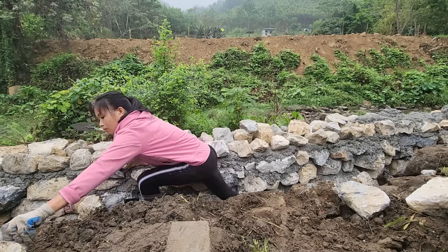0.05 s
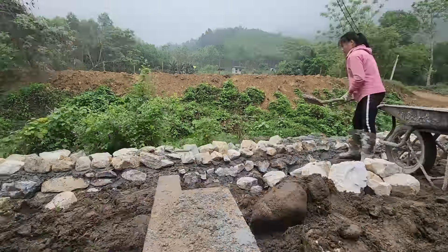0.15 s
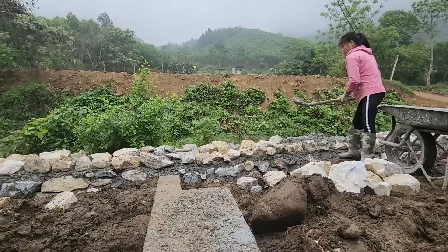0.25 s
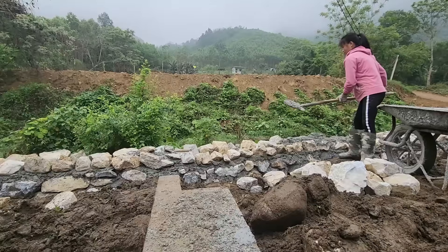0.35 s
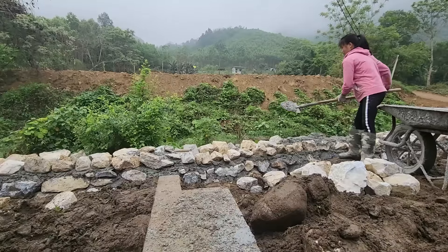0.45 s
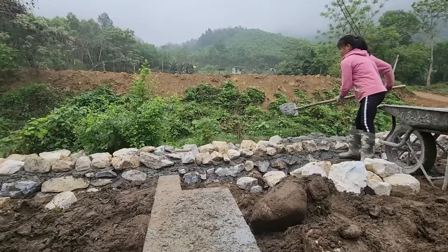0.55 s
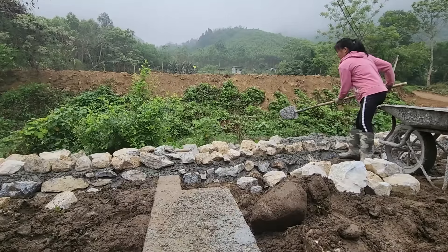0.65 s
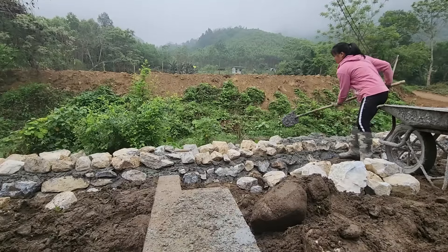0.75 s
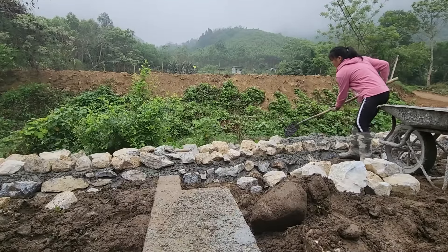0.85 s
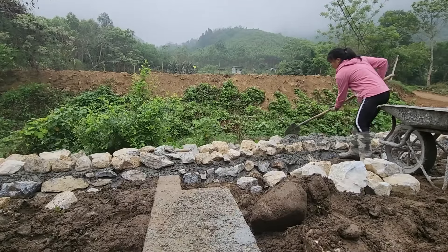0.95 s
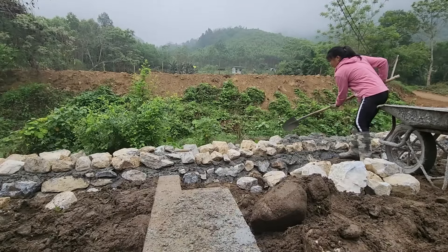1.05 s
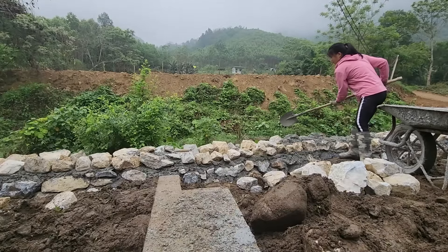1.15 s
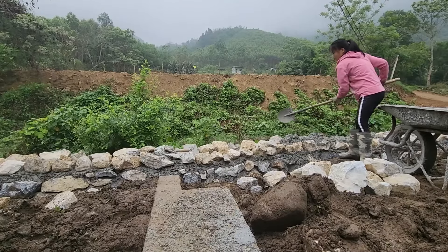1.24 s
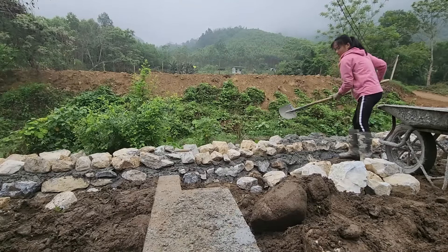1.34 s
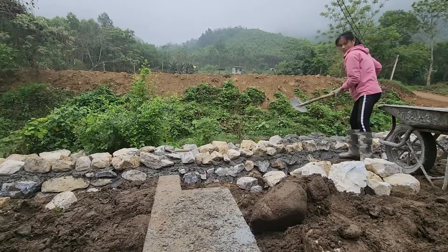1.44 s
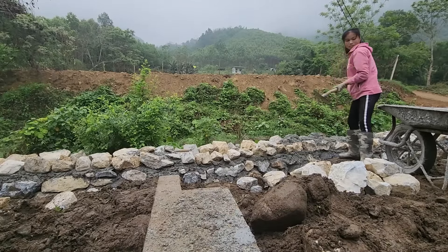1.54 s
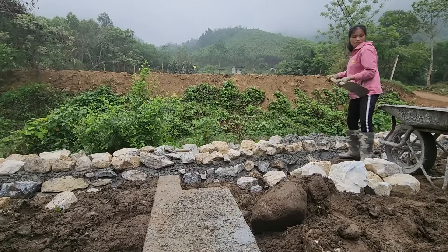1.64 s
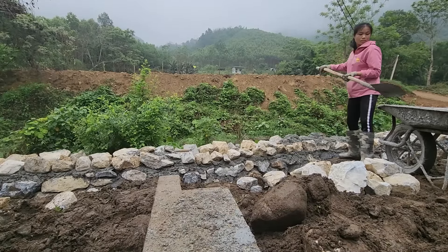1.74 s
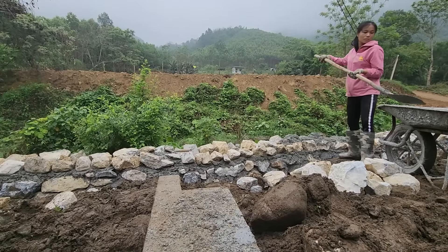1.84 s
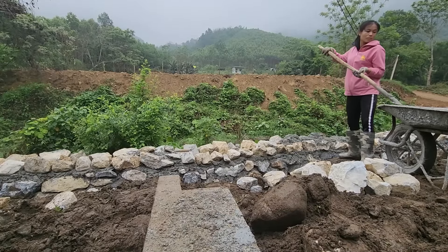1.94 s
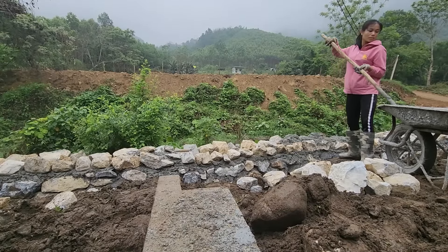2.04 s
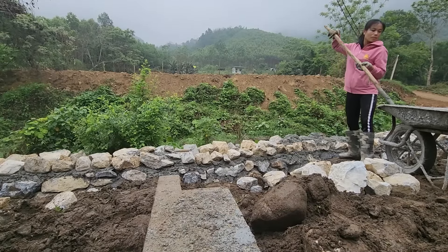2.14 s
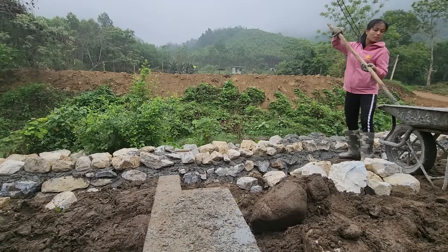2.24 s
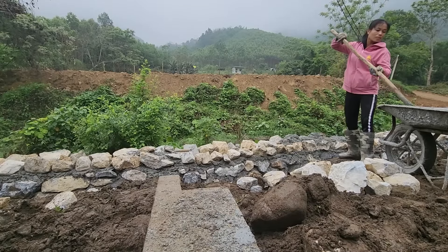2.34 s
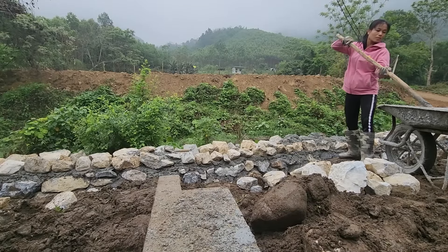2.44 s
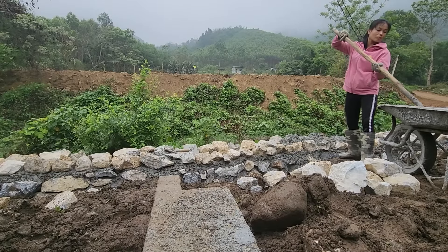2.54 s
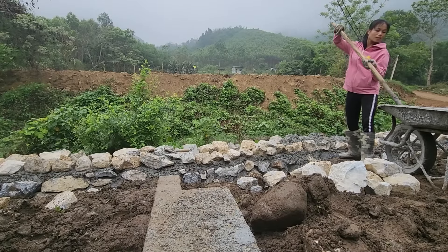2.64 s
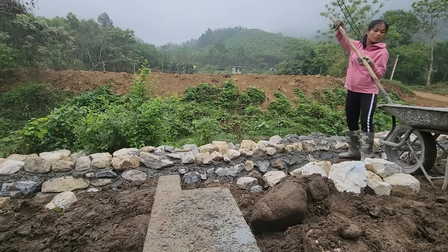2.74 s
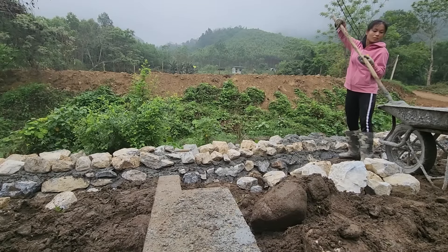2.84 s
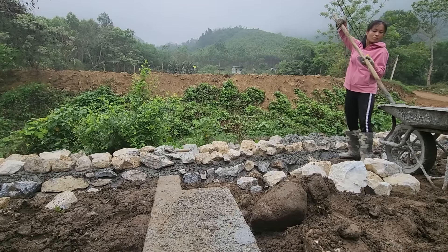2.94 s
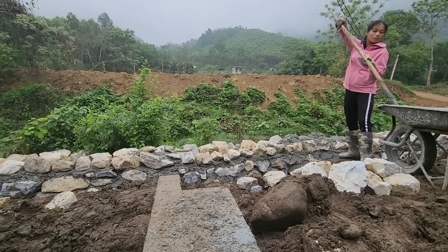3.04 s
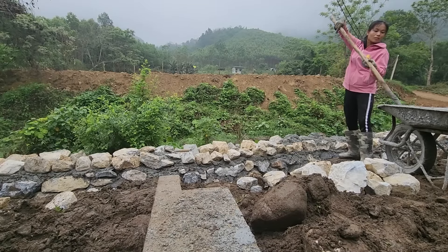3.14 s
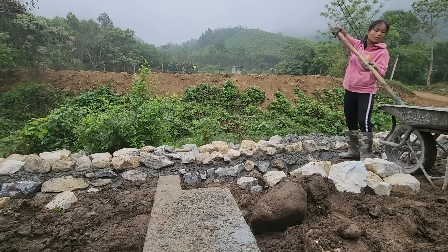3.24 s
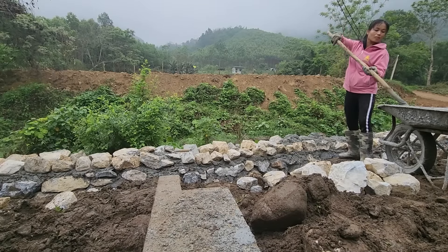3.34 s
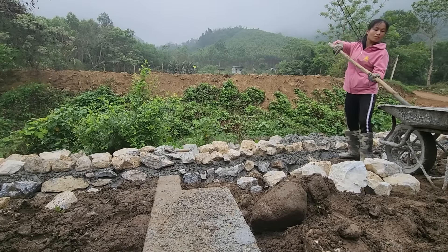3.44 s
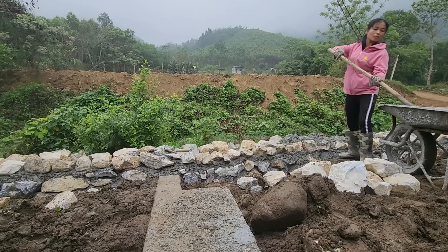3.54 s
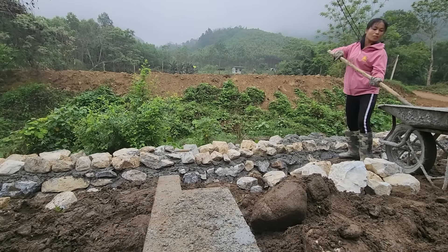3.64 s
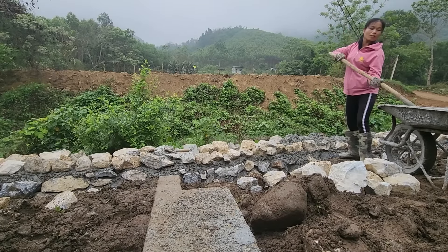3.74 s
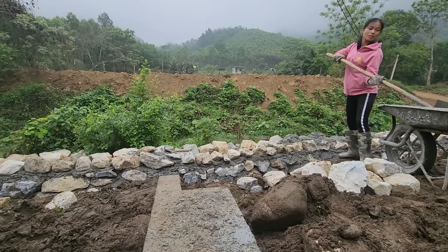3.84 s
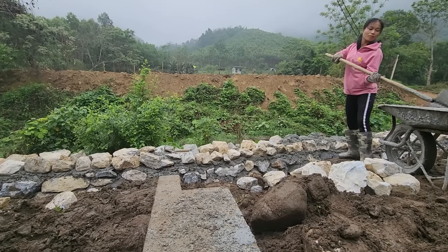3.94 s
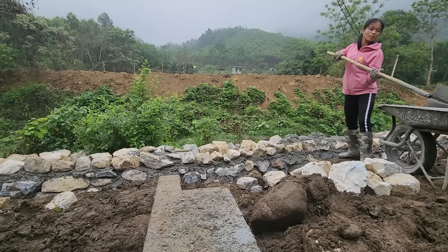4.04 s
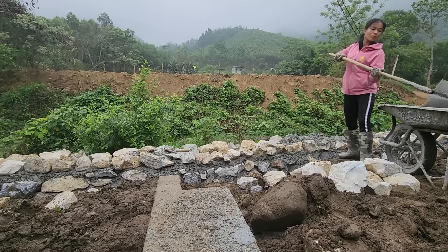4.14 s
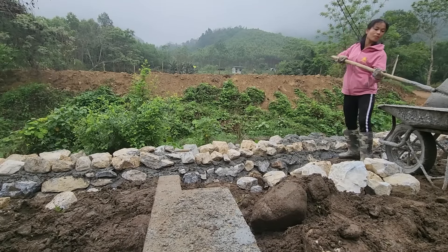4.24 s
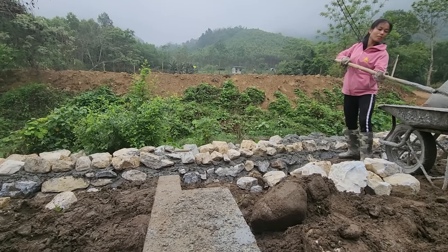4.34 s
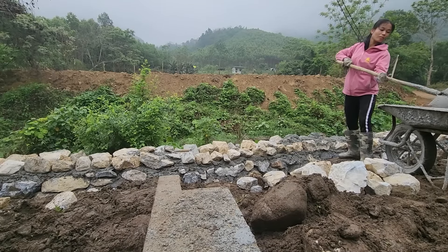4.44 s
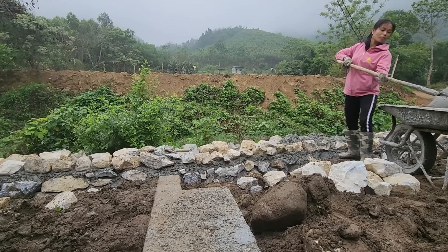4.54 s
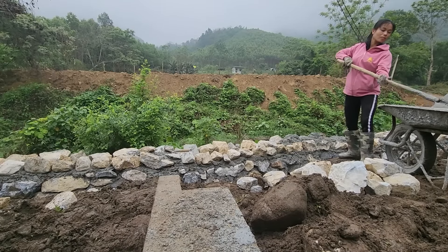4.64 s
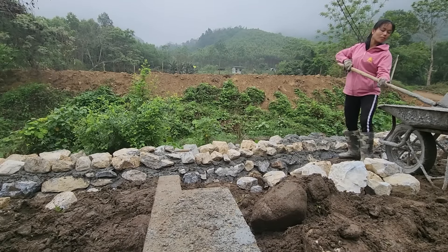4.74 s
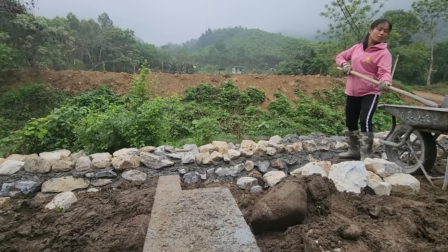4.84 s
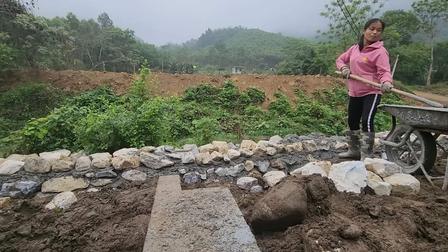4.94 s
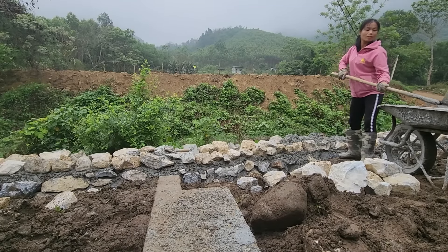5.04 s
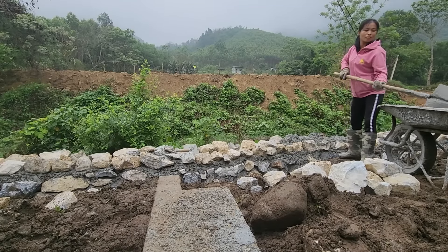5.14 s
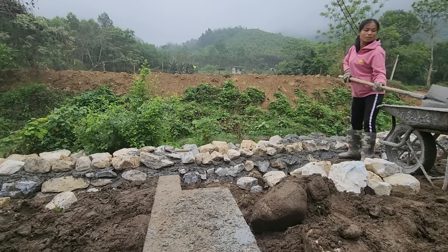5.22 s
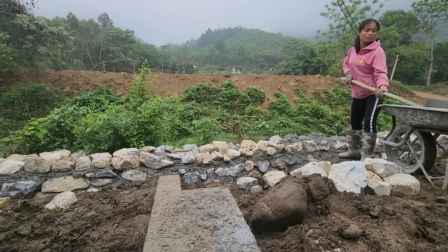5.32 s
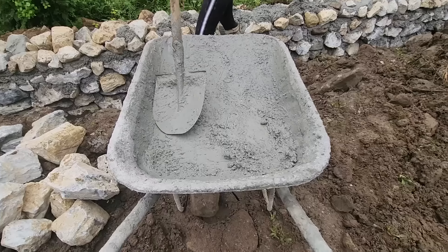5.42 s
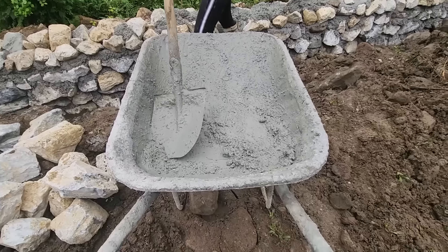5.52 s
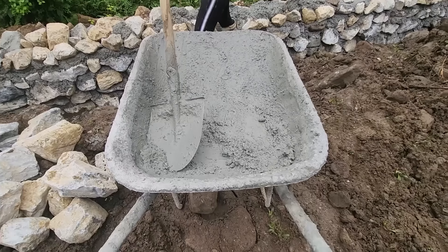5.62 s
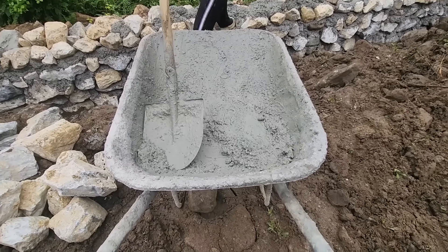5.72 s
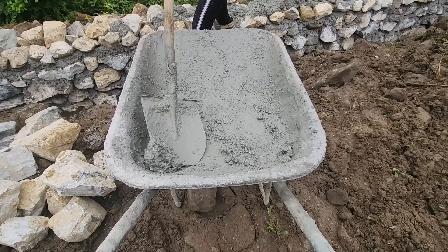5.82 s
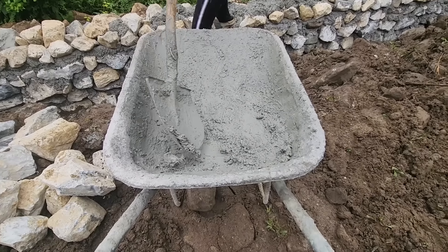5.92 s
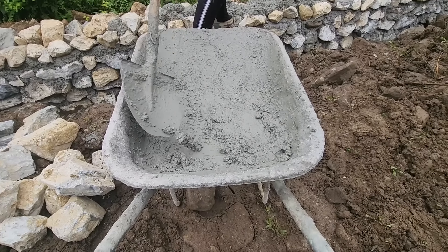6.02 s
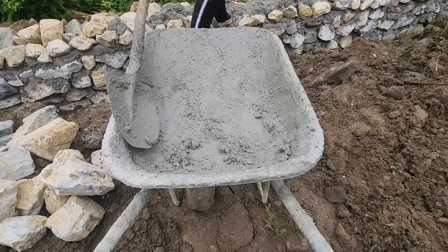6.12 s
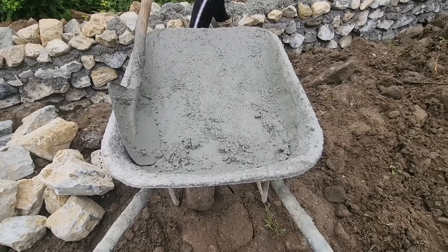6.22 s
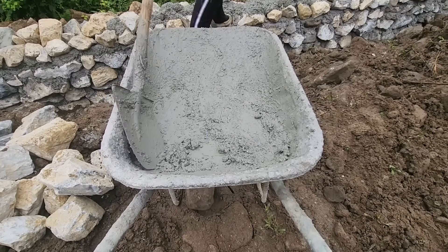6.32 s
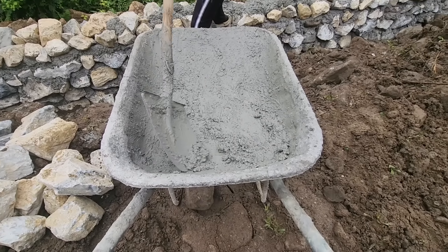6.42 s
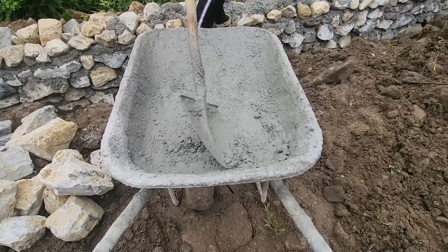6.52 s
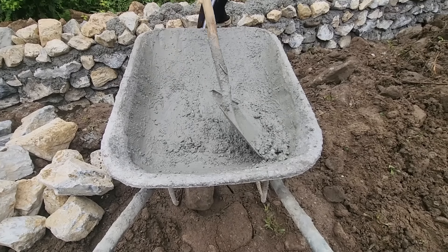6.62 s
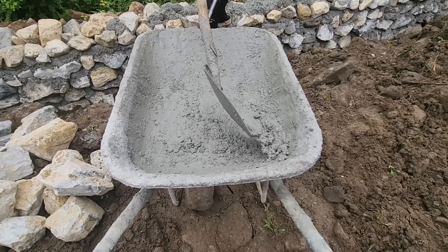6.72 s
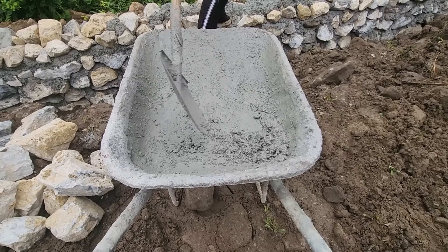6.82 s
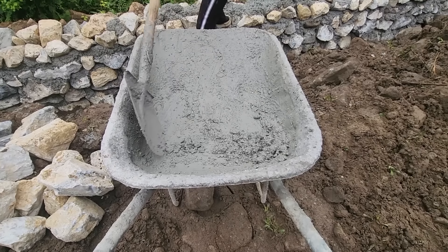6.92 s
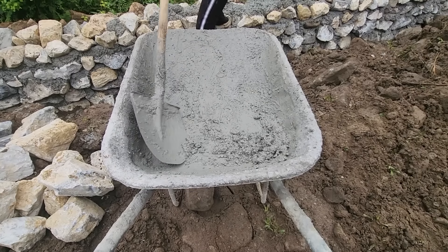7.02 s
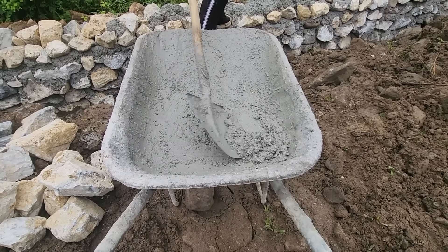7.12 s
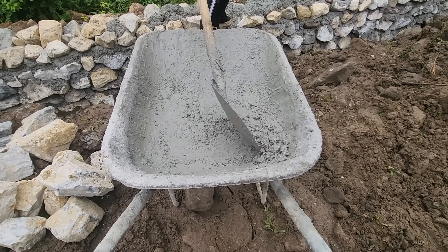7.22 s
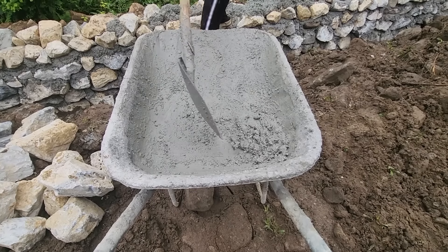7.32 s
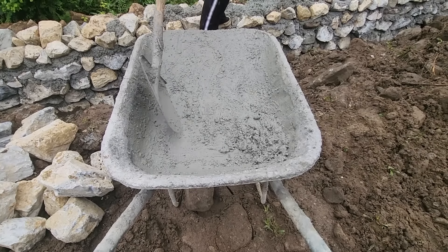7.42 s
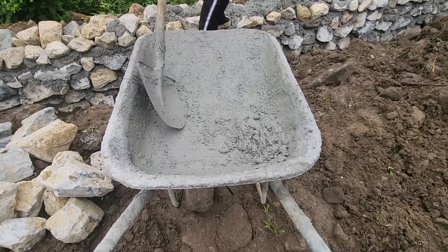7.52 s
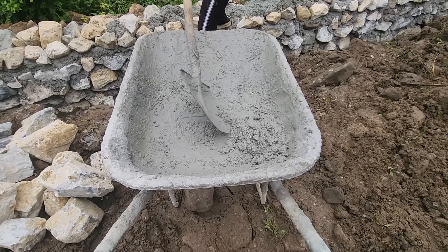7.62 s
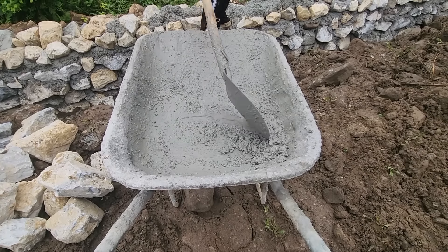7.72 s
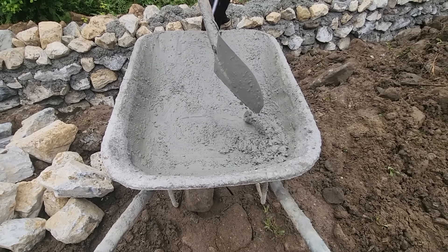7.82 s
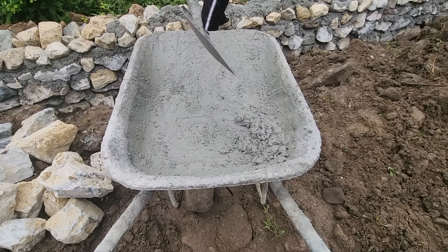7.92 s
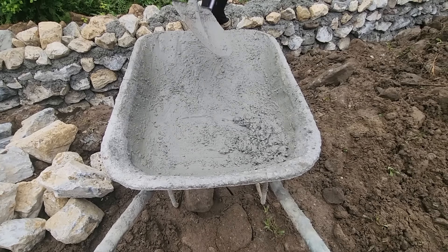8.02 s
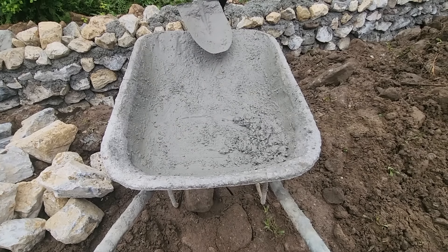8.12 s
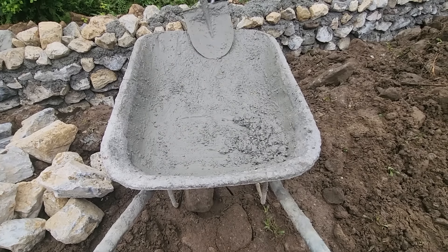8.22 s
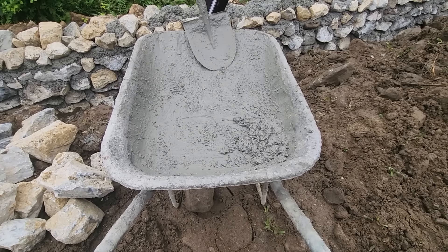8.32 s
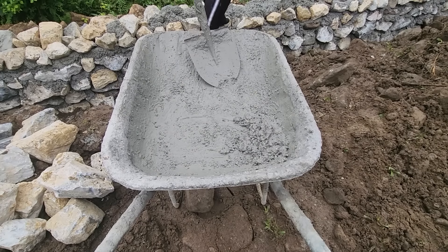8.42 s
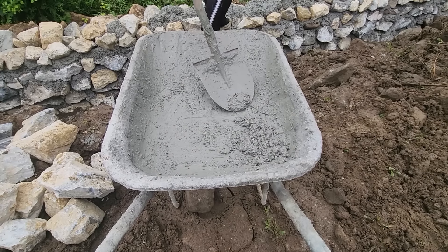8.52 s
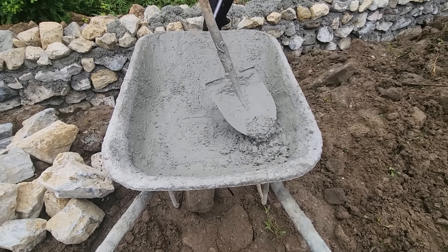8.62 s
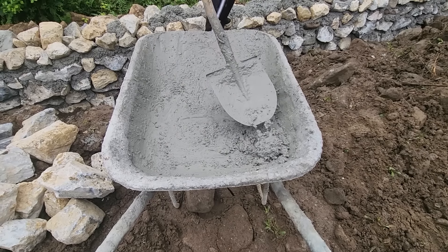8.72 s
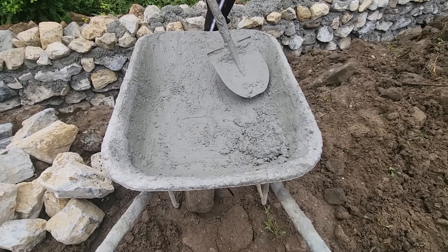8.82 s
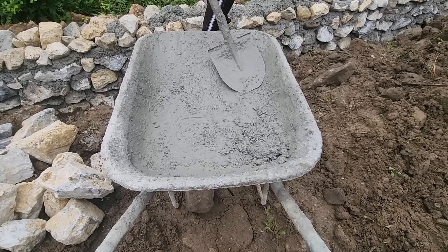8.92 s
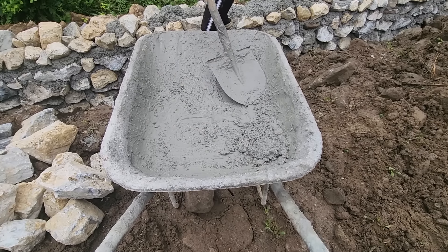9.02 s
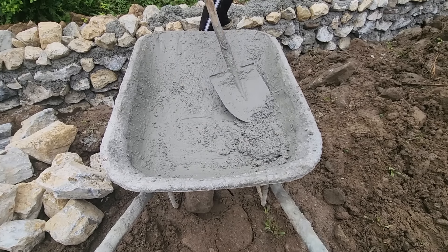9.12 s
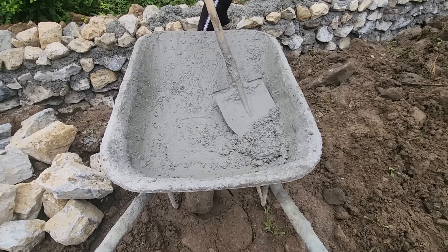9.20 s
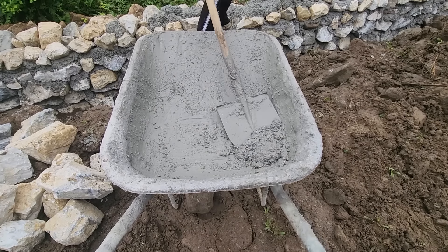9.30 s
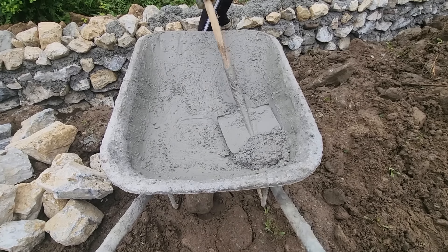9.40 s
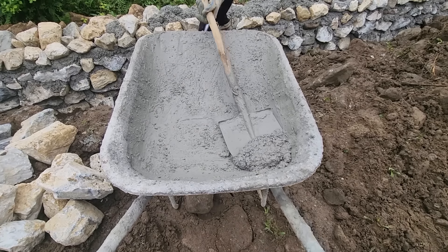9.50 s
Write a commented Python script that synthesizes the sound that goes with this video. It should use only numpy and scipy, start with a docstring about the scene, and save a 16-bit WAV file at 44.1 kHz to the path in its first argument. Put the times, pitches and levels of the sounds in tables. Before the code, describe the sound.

A steel shovel rasps and knocks through wet mortar in a metal wheelbarrow outdoors, first metres away, then loud and close, with small birds singing.

```python
"""Wet mortar is worked with a steel shovel in a steel wheelbarrow, outdoors, while small birds sing.
Insects and a low drone sound throughout. A short smear at the left opens the work; the level dips briefly.
The strokes then come from the right, a few metres off; from 5.49 s they are at the left, close over the
tray. Grains, blows and narrow-toned noise sound the steel through resonant filters; the birds are gliding sines."""
import sys
import numpy as np
from scipy import signal
from scipy.io import wavfile
from scipy.ndimage import uniform_filter1d, map_coordinates

SR = 44100
rng = np.random.default_rng(int(sys.argv[2]) if len(sys.argv) > 2 else 0)


def persist_wave(psi):
    """Save psi, clipped to +-1, as 16-bit WAV."""
    counts = np.round(np.clip(psi, -1, 1) * 32767).astype(np.int16)
    wavfile.write(sys.argv[1], SR, np.atleast_2d(counts).T)


N = 421596
TAPS = 8192  # length of the filter spectra, samples
HZ, TIME = np.fft.rfftfreq(TAPS, 1 / SR), np.arange(N) / SR
MOVE_CLOSE_S = 5.49  # from here on the work is heard from close by


def amp(db):
    """Level law: decibels to amplitude gain."""
    return 10 ** (np.asarray(db) / 20)


def evened(x):
    """Power normalization: scales to rms 1."""
    return x / np.sqrt(np.mean(x ** 2) + 1e-20)


def read(points, hz):
    """Spectral interpolation: reads a table on a log-frequency axis."""
    f, value = np.transpose(points)
    return np.interp(np.log(hz + 1), np.log(f + 1), value)


def add(mix, s, sound):
    """Superposition: adds a sound to the mix at time s, in place."""
    start = round(s * SR)
    sound = sound[..., max(-start, 0):]
    part = mix[..., max(start, 0):][..., :sound.shape[-1]]
    part += sound[..., :part.shape[-1]]


def wander(hz):
    """Slow random modulation: rms 1, with hz new random values a second joined by lines."""
    return evened(np.interp(TIME * hz, np.arange(TAPS), rng.standard_normal(TAPS)))


def likened(left, other, same):
    """Interaural coherence: a left-right pair whose likeness is same, from two independent noises."""
    return np.array([left, same * left + np.sqrt(1 - same ** 2) * other])


# relative spectrum of the open valley; columns: frequency_hz, density_db (per Hz)
VALLEY_COLOUR = [(59, -29), (100, -1), (193, -23), (295, -26), (381, -18.5), (424, -19), (872, -12),
                 (1280, -21), (1760, -16), (1950, -20), (2420, -14), (2750, -16.5), (5420, -9),
                 (6020, -13.5), (16000, -34.5)]
# left-right likeness of the valley air; columns: frequency_hz, likeness (-1 to 1)
VALLEY_LIKENESS = [(60, 0.68), (240, 0.52), (950, -0.15), (3770, -0.27), (15000, 0.093)]
# levels in the valley; columns: time_s, air_level_db, drone_level_db
VALLEY_LEVELS = [(0, -47.5, -74), (.3, -57.5, -62.5), (1.2, -59.5, -60.5), (1.8, -59.5, -62.5),
                 (2.3, -57, -61.5), (4.2, -55.5, -68), (5.4, -55, -60), (6, -54.5, -61), (7.4, -55.5, -60),
                 (8.1, -53.5, -60), (9.5, -49, -56)]


def valley(patch_db=2.0, drone_hz=70, drone_width_hz=28):
    """Filtered noise: a high shimmer of insects in drifting patches, over a far resonant low drone."""
    hz = np.fft.rfftfreq(1024, 1 / SR)
    a, b, c, d, patches = rng.standard_normal((5, N // 256 + 5, len(hz)))
    # smoothing over time, then frequency, makes patches of louder and softer air
    patches = uniform_filter1d(patches, size=14, axis=0)
    patches = evened(uniform_filter1d(patches, size=8, axis=1))
    same = np.clip(read(VALLEY_LIKENESS, hz), -1, 1)
    gain = amp(read(VALLEY_COLOUR, hz) + patch_db * patches)
    spectra = likened(a + 1j * b, c + 1j * d, same) * gain
    air = signal.istft(spectra, nperseg=1024, noverlap=768, time_axis=1, freq_axis=2)[1][:, :N]
    resonance = signal.iirpeak(drone_hz, drone_hz / drone_width_hz, SR)
    drone = signal.lfilter(*resonance, rng.standard_normal(N))
    drone = signal.lfilter(*signal.butter(2, 2 * drone_hz, fs=SR), drone)
    s, air_db, drone_db = np.transpose(VALLEY_LEVELS)
    air_gain, drone_gain = [amp(np.interp(TIME, s, db)) for db in (air_db, drone_db)]
    return evened(air) * air_gain + evened(drone) * drone_gain


def causal(gain):
    """Minimum phase: the response that has this spectrum and rings only after the blow."""
    log_gain = np.log(np.maximum(gain / gain.max(), 1e-5))
    circle = np.concatenate([log_gain, log_gain[-2:0:-1]])
    return np.fft.ifft(np.exp(np.conj(signal.hilbert(circle)))).real[:TAPS // 2]


# resonances (dips where below 0 dB) of tray and blade; columns: frequency_hz, width_hz,
# level_db (over the broad colour)
STEEL_MODES = [(227.5, 10.3, 6), (299, 4.9, 2), (376, 74, 0.5), (623, 22, 5.5), (725, 35, 3.5),
               (796, 37, 5), (883, 37, 7.5), (976, 84, 6), (1165, 104, 6.5), (1650, 140, -3.5),
               (1820, 240, -2.5), (2440, 186, 8.5), (2700, 180, 5.5), (4000, 120, -1), (4300, 200, -1)]
# relative broad colour of the work from afar, then from close by; columns: frequency_hz, density_db (per Hz)
FAR_COLOUR = [(18, -52), (30, -6), (161, -1.5), (266, -7), (328, -3.5), (554, -8.5), (649, -11.5),
              (844, -6), (1070, -17), (1760, -2), (2170, -13.5), (2410, -16), (5590, -20), (6900, -23.5),
              (16000, -29)]
NEAR_COLOUR = [(18, -52), (30, -15), (134, -17.5), (280, -0.5), (437, -12.5), (632, -4.5), (1280, -8.5),
               (1670, 2), (2120, -9), (2410, -12.5), (2980, -15.5), (6550, -18), (12300, -25), (14800, -20),
               (16000, -34)]
# rows: frame, tray, blade, sand; columns: lowest_hz, highest_hz, ring_t60_s,
# ring_level_db (against the direct sound), likeness (of the ring, left to right)
BARROW_PARTS = [(45.5, 167, 0.18, -1.5, 0.97), (158, 508, 0.128, 3, 0.98), (493, 4700, 0.057, 3, 0.25),
                (3180, 47000, 0.012, 20.5, 0.0092)]


def barrow(colour):
    """Modal resonance: frame, tray, blade and sand each take their own range of the steel's peaks."""
    power = 1 + sum((amp(db) ** 2 - 1) / (1 + (2 * (HZ - hz) / width) ** 2)
                    for hz, width, db in STEEL_MODES)
    gain = amp(read(colour, HZ)) * np.sqrt(abs(power))
    responses = []
    for lo, hi, *_ in BARROW_PARTS:
        band_power_loss = (1 + (lo / (HZ + 1)) ** 10) * (1 + (HZ / hi) ** 10)
        responses.append(causal(gain / np.sqrt(band_power_loss)))
    return responses


def radiate(force, response, part, size=1024):
    """Convolution: a force rings one part; its dense ring changes as the contact moves along."""
    _, _, t60, ring_db, same = part
    count, same = len(force) // size + 2, np.clip(same, 0, 1)
    # overlapping pieces of the force, each with a ring of its own
    padded = np.pad(force, (size, (count + 1) * size - len(force)))
    pieces = np.lib.stride_tricks.sliding_window_view(padded, 2 * size)[::size][:count]
    pieces = pieces * signal.windows.cosine(2 * size)
    t = np.arange(int(np.clip(t60 * SR, size, TAPS - 2 * size))) / SR
    left, other = rng.standard_normal((2, count, len(t))) * 1e-3 ** (t / t60)
    rings = likened(left, other, same) / np.linalg.norm(left[0])
    rung = signal.fftconvolve(pieces[None], amp(ring_db) * rings, axes=2)
    out = np.zeros((2, len(force) + len(t)))
    add(out, 0, force)
    for k in range(count):
        add(out, (k - 1) * size / SR, rung[:, k])
    coloured = signal.fftconvolve(out, response[None], axes=1)
    return coloured / np.linalg.norm(response) / np.hypot(1, amp(ring_db))


def grit(grains_per_s=8000, spread_db=4.5, smear=0.49):
    """Shot noise: grains of very unequal size crack under the edge, over the smear of the fine paste."""
    size = amp(spread_db * np.minimum(rng.exponential(1, N), 5))
    grains = size * rng.choice([-1, 1], N) * (rng.random(N) < grains_per_s / SR)
    return evened(evened(grains) + smear * rng.standard_normal(N))


# fall of frame, tray, blade and sand once the blade is lifted; column: release_db_per_s
RELEASE_RATES = [170, 250, 345, 310]


def stroke_gains(length, rise, rasp_db, swell_db, boom_change_db, frame_db, tray_db, sand_db,
                 sand_arch_db=2, settle_db=(-18, -32, -31.5, -23.5), settle_db_per_s=51):
    """Envelope of friction: bite, swelling or fading drag, release, then loose mortar slides back."""
    t = TIME[:int((length + .5) * SR)]
    along, after = np.minimum(t / length, 1) - .5, np.maximum(t - length, 0)
    bite = np.minimum(t / max(rise, 1e-4), 1)
    # the sand hisses most in mid-stroke, where the blade is fastest
    arch_db = sand_arch_db * (np.cos(np.pi * along) - .5)
    parts_db = [frame_db, tray_db + boom_change_db * along, 0, sand_db + arch_db]
    gains = []
    for db, release, start_db in zip(parts_db, RELEASE_RATES, settle_db):
        lifted = amp(-release * after)
        settling = amp(start_db - settle_db_per_s * after)
        gains.append(bite * amp(rasp_db + swell_db * along + db) * np.maximum(lifted, settling))
    return gains


# pushes and drags of the blade; columns: start_s, length_s, rise_s, rasp_level_db (midway, before trim),
# swell_db (change from start to end), boom_change_db (of the tray's boom from start to end of the stroke),
# frame_level_db, tray_level_db, sand_level_db (against the rasp, before trim and the sand's arch)
BLADE_STROKES = [ (0.0, 0.17, 0.023, -50, 6, 1, -6, -10, -7.5),
                 (0.89, 0.15, 0.09, -59, -10, -2, -24, -10, 13),
                 (1.42, 0.29, 0.042, -69.5, -9, 0, -9, -5.5, 2.5),
                 (2.127, 0.046, .004, -44.5, -0.5, -2, -2, -5, -20),
                 (2.194, 0.23, 0.021, -43, 10, -16, -29, -3, -1),
                 (2.606, 0.077, 0.013, -62.5, 16.5, -12, -4, 2.5, 6),
                 (2.918, 0.58, 0.031, -43, 3, 3, -16.5, -11, -2.5),
                 (3.496, 0.069, 0.02, -38.5, -2.5, 4, -9, -8, -2),
                 (3.614, 0.13, 0.024, -55, 12, -13, -4, 0, -20),
                 (4.373, .21, .005, -54.5, -13, 14, 8.5, 3.5, -4),
                 (4.585, 0.2, 0.012, -42.5, -4.5, -7, -1, -0.5, -10),
                 (4.839, 0.091, 0.03, -49, -6, 0, -16, -7.5, -1.5),
                 (5.253, .12, 0.0044, -40.5, 1.5, -14, -7, -7, -8.5),
                 (5.42, 0.31, .03, -41, 3.5, 0, -10, -9, -4.5),
                 (5.767, 0.071, .006, -38, 12.5, -19, -14, -1.5, -3),
                 (5.888, 0.32, 0.12, -53.5, -7, 4, -23, -10, 6),
                 (6.193, 0.099, 0.0045, -29.5, -4.5, -3.5, -3, 1, -10),
                 (6.293, 0.11, 0.011, -33.5, 21.5, -24, -3.5, 3, -4.5),
                 (6.422, 0.22, .01, -27, -7, -3, -13, -3.5, -2),
                 (6.693, .17, 0.013, -56, 20.5, 14, -19, -12, 4.5),
                 (7.004, 0.18, 0.018, -23.5, 5.5, 7, -19.5, -6.5, 0),
                 (7.358, 0.064, 0.038, -45, 1, 6, -27, -7, 0),
                 (7.518, 0.19, 0.03, -23.5, 9.5, -1, -26, -4.5, -1.5),
                 (8.233, 0.097, 0.0027, -31.5, 8.5, -18, -18, 0, -4),
                 (8.371, 0.21, 0.0043, -28, 4, -6, -24, -1.5, -2),
                 (8.588, 0.23, 0.008, -56, -24, -8, -14, -20, 8.5),
                 (8.982, 0.18, .01, -25.5, -1, 1, -18, -5.5, -5),
                 (9.122, 0.12, .03, -21, 9.5, 10, -34, -16, -4.5),
                 (9.235, 0.27, 0.017, -25.5, 2.5, 1, -13.5, -4, -8.5)]


def scrapes(far, near, pressure_hz=32.1, pressure_db=1.84, judder_hz=140, judder_db=2.5,
            hiss_judder_db=1.03, trim_db=(-1, 0, 1.5, 2)):
    """Stick-slip friction: the blade judders over the grit, the steel more than the hiss of the sand."""
    grains = grit() * amp(pressure_db * wander(pressure_hz))  # the hands press unevenly
    slips = wander(judder_hz)
    rough = evened(grains * amp(judder_db * slips))
    smooth = evened(grains * amp(hiss_judder_db * slips))
    power = np.zeros((len(BARROW_PARTS), N))
    for s, *shape in BLADE_STROKES:
        add(power, s, np.square(stroke_gains(*shape)))
    gains = np.sqrt(power)
    drives = [rough, rough, rough, smooth]
    out, move = np.zeros((2, N)), int(MOVE_CLOSE_S * SR)
    for span, responses in [(slice(0, move), far), (slice(move, N), near)]:
        for drive, gain, trim, response, part in zip(drives, gains, trim_db, responses, BARROW_PARTS):
            force = drive[span] * gain[span] * amp(trim)
            add(out, span.start / SR, radiate(force, response, part))
    return out


# narrow-toned squawks, rustles and knocks of the blade; columns: middle_s, length_s, pitch_hz,
# width_hz (of each of two filter passes), level_db
BLADE_TONES = [(0.102, 0.069, 890, 503, -42), (0.994, 0.16, 1920, 794, -47), (2.768, 0.012, 1327, 352, -26),
               (3.304, 0.47, 820, 200, -45.5), (4.69, 0.22, 847, 170, -37), (5.497, 0.014, 670, 390, -19),
               (6.239, 0.039, 2330, 398, -15), (7.027, 0.061, 810, 250, -19.5),
               (7.026, 0.037, 2350, 300, -20.5), (7.093, 0.027, 1660, 298, -13),
               (7.127, 0.039, 990, 200, -18), (7.176, 0.041, 410, 260, -26), (7.557, 0.076, 2400, 300, -35),
               (9.164, 0.042, 930, 400, -25), (9.363, 0.11, 1060, 400, -21.5),
               (9.476, 0.059, 1500, 457, -11.5)]


def narrow_tones():
    """Forced resonance: for a moment the grit drives one bending resonance of the blade."""
    out, grains = np.zeros(N), grit()
    for s, length, hz, width, db in BLADE_TONES:
        start, count = max(int((s - length / 2) * SR), 0), int(length * SR)
        b, a = signal.iirpeak(hz, hz / width, SR)
        push = grains[start:start + count] * signal.windows.tukey(count, .5)
        push = np.pad(push, (0, TAPS // 8))  # room for the ring
        tone = signal.lfilter(b, a, signal.lfilter(b, a, push))
        add(out, start / SR, amp(db) * np.sqrt(count / 2) * tone / np.linalg.norm(tone))
    return out


def crumbs(per_s=5, level_db=-56, spread_db=3, near_db=7, boom_db=-6, sand_db=-3, crunch_s=.004):
    """Random impacts: crumbs of mortar drop off the blade, as rows like those of BLADE_KNOCKS."""
    rows = []
    for when, size in rng.random((int(per_s * N / SR), 2)):
        s = when * N / SR
        db = level_db + spread_db * (2 * size - 1) + near_db * (s > MOVE_CLOSE_S)
        rows.append((s, db, boom_db, sand_db, crunch_s))
    return rows


# blows of the blade on the tray and on stones; columns: start_s, strength_db (before trim),
# boom_level_db, sand_level_db (against the blade, before trim), crunch_s (decay time constant)
BLADE_KNOCKS = [(0.147, -33, -18, -26, 0.0033), (0.717, -52, 2, -19, 0.0055), (0.764, -61, -1, 18, .008),
                (1.957, -47, 3, -21, 0.0069), (2.128, -32.5, 3.5, -28, 0.0041),
                (2.239, -22, -29, -31, 0.0017), (2.767, -23.5, -1, -0.5, 0.012),
                (3.126, -22, -24, -11, 0.0099), (3.367, -33.5, -6, 6, .006), (3.755, -36.5, -13, -14, .004),
                (4.37, -26.5, -3.5, -3.5, 0.0063), (4.475, -26, -1.5, -15, 0.0081),
                (4.537, -32.5, -3, -10.5, 0.0021), (4.593, -38, 4, -29, 0.0042),
                (4.668, -16, -3.5, -14, 0.0012), (4.7, -23.5, 1, 2, 0.0024), (4.727, -25.5, -10, 2, 0.0074),
                (5.126, -40.5, -4, -22, 0.014), (5.238, -18.5, 0, -24, 0.002), (5.354, -19, -8, -3, 0.0024),
                (5.405, -17, -14, -4.5, 0.0037), (5.471, -17, -27, -3, .0024),
                (5.495, -30, -0.5, -25, 0.0026), (5.777, -29.5, 4.5, -4, 0.0024),
                (5.862, -18.5, -6, -8, 0.0046), (6.12, -35.5, -14, -7, 0.0044),
                (6.192, -10, 4.5, -9.5, 0.0084), (6.23, -10, -4, -1.5, 0.0058),
                (6.266, -15.5, -22, -3, .004), (6.285, -13.5, -20, -4, 0.0022),
                (6.347, -13.5, -3.5, -12, 0.0054), (6.43, -12.5, -3.5, 6.5, 0.001),
                (6.99, -5, -13, -11, 0.00094), (7.018, -8, -20, -10, 0.0058), (7.151, -14.5, 2, 9, 0.014),
                (7.189, -14, -2, 3, 0.0018), (7.399, -39.5, -15, 18, 0.0013),
                (7.523, -11.5, -13, 0.5, 0.0017), (7.544, -26.5, -14, 18, 0.0059),
                (7.57, -32, -19, 17.5, .005), (7.983, -34.5, -9, -2, 0.024), (8.124, -39.5, -17, -5, .0035),
                (8.237, -14, -12, -2, 0.0064), (8.246, -14.5, -1, 2, 0.0028), (8.334, -9.5, -14, -2, .004),
                (8.381, -15.5, -27, -1.5, 0.0033), (8.422, -8, -19, -5.5, 0.0062),
                (8.537, -6.5, -4, -6, 0.0026), (8.855, -54, 14, 0, 0.0024), (8.93, -12, -15, -1.5, 0.01),
                (8.941, -2, -12, -7.5, 0.011), (8.987, -13.5, -5.5, -7.5, 0.0034),
                (9.321, -12.5, -7.5, -11, 0.0069), (9.451, -9.5, -18, -10, 0.0075)]


def knocks(far, near, trim_db=(18, 20, 18, 18), crunch=(.5, 1.1, 2.2, 4.3), crunch_rise_s=0.0011):
    """Impact excitation: a blow is one push and a crunch of crushed grains."""
    t, out = np.arange(TAPS // 4 - 1) / SR, np.zeros((2, N))
    for s, db, boom_db, sand_db, length in BLADE_KNOCKS + crumbs():
        envelope = np.exp(-t / length) * (1 - np.exp(-t / crunch_rise_s)) ** 2
        burst = rng.standard_normal(len(t)) * envelope
        burst = burst / np.linalg.norm(burst)
        # thud of the frame against the boom of the tray, dB
        responses, frame_db = (far, -2.5) if s < MOVE_CLOSE_S else (near, -9.5)
        parts_db = [boom_db + frame_db, boom_db, 0, sand_db]
        for part_db, trim, share, response, part in zip(parts_db, trim_db, crunch, responses, BARROW_PARTS):
            sound = radiate((t == 0) + share * burst, response, part)
            add(out, s, amp(db + part_db + trim) * sound / np.sqrt(np.sum(sound ** 2) / 2))
    return out


def whistle(length, pitch_hz, db, flutter_db=5.0):
    """Frequency modulation: a note bends through three pitches and flutters on its way through the air."""
    u = np.linspace(0, 1, int(length * SR))
    hz = np.polyval(np.polyfit([0, .5, 1], pitch_hz, 2), u)
    flutter = np.interp(u, np.linspace(0, 1, 10), rng.standard_normal(10))
    return amp(db + flutter_db * flutter) * np.sin(np.pi * u) * np.sin(2 * np.pi * np.cumsum(hz) / SR)


# bouts of the bird's song; columns: first_phrase_s, last_phrase_s, level_db
SONG_BOUTS = [(0.198, 2.11, -55.5), (2.602, 2.83, -53.5), (5.878, 5.879, -49.5), (6.715, 6.715, -52),
              (7.818, 8.093, -56)]
# notes of a phrase, before random pace and pitch; columns: delay_s, length_s,
# start_pitch_hz, middle_pitch_hz, end_pitch_hz, level_db (against the bout)
PHRASE_NOTES = [(0, 0.05, 7500, 5570, 4360, -0.5), (0.054, 0.098, 6360, 7660, 7940, -11),
                (.12, 0.037, 5070, 4800, 4500, -2.5), (.165, .03, 5000, 4550, 4300, -17)]
# farther birds whistle and hoot; columns: start_s, length_s, start_pitch_hz, middle_pitch_hz,
# end_pitch_hz, level_db (before flutter)
DISTANT_CALLS = [(0.334, 0.082, 3000, 3280, 3160, -69), (0.377, 0.053, 5250, 5250, 5270, -62),
                 (0.453, 0.042, 3300, 2890, 2700, -80), (0.503, 0.072, 3950, 3250, 4140, -67),
                 (1.5, 0.053, 505, 474, 456, -56), (2.555, 0.03, 3460, 3440, 3550, -59),
                 (2.64, 0.046, 3750, 3380, 3200, -61), (3.858, 0.073, 393, 382, 380, -60.5),
                 (4.115, 0.085, 385, 387, 377, -62.5)]


def birds(phrase_every_s=.272, waver=0.033, pace_spread=0.1045, echo_db=-5, echo_t60=0.66):
    """Diffuse scattering: thin whistled sweeps, never twice alike, are scattered a little by the trees."""
    song = np.zeros(N)
    for first, last, db in SONG_BOUTS:
        phrase_count = 1 + round(abs(last - first) / phrase_every_s)
        for s in np.linspace(first, last, phrase_count):
            for delay, length, *pitch_hz, note_db in PHRASE_NOTES:
                sharp, slow = rng.standard_normal(2)
                pitch_hz = np.array(pitch_hz) * (1 + waver * sharp)
                add(song, s + delay, whistle(length * np.exp(pace_spread * slow), pitch_hz, db + note_db))
    for s, length, *pitch_hz, db in DISTANT_CALLS:
        add(song, s, whistle(length, pitch_hz, db))
    t = TIME[:SR // 2]
    trees = rng.standard_normal((2, len(t))) * 1e-3 ** (t / echo_t60)
    echo = signal.fftconvolve(song[None], trees / np.linalg.norm(trees[0]), axes=1)[:, :N]
    return song + amp(echo_db) * echo


# direction of the blade; columns: time_s, left_lag_samples (negative where the left ear leads)
BLADE_BEARING = [(0, -15), (.24, -15), (.26, 10), (5.48, 10.5), (5.5, -12), (6.2, -13), (6.6, -5), (7, -15),
                 (7.6, -15), (8.2, -4), (8.6, -8), (9.5, -9)]


def scene(low_left_db=1.2):
    """Interaural delay: the work reaches one ear first; the tray's boom lies nearer the middle."""
    air = valley()
    far, near = barrow(FAR_COLOUR), barrow(NEAR_COLOUR)
    left, right = scrapes(far, near) + narrow_tones() + knocks(far, near)
    low = signal.sosfiltfilt(signal.butter(2, 1100, fs=SR, output="sos"), left)
    now, lag = np.arange(N), np.interp(TIME, *np.transpose(BLADE_BEARING))
    high_left = map_coordinates(left - low, [now - lag], order=5)
    low_left = amp(low_left_db) * np.interp(now - lag / 2, now, low)  # half the lag
    return np.array([high_left + low_left, right]) + birds() + air


def record(dry, dip_from_s=.217, dip_to_s=.261, dip_db=-24, edge_hz=16050):
    """Saturation and band limit: peaks are rounded, the level dips briefly, the top treble is cut."""
    rounded = dry / (1 + (dry / .9) ** 6) ** (1 / 6)
    dip = uniform_filter1d(1. * ((TIME > dip_from_s) & (TIME < dip_to_s)), size=128)
    low_pass = signal.firwin(511, edge_hz, window=("kaiser", 9), fs=SR)
    return signal.oaconvolve(rounded * amp(dip_db * dip), low_pass[None], "same")


dry = scene()
out = record(dry)
persist_wave(out)
```